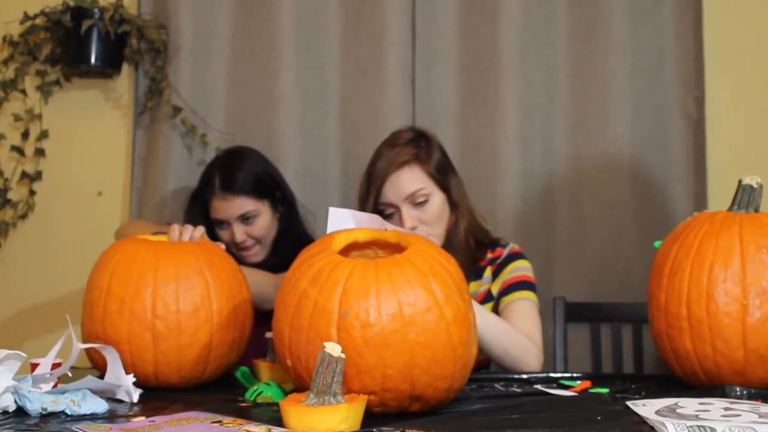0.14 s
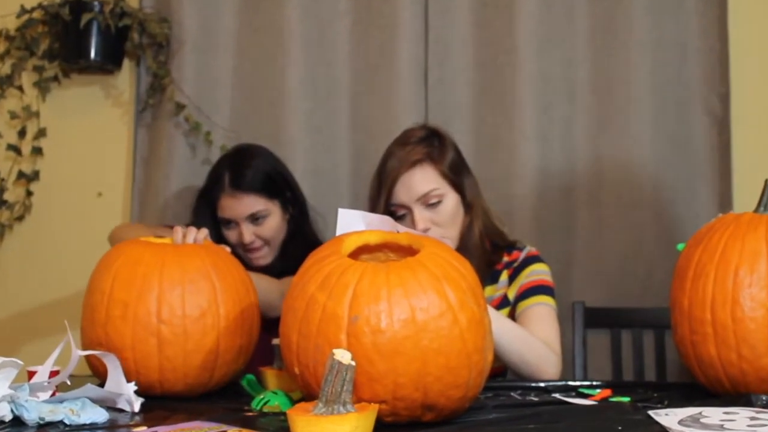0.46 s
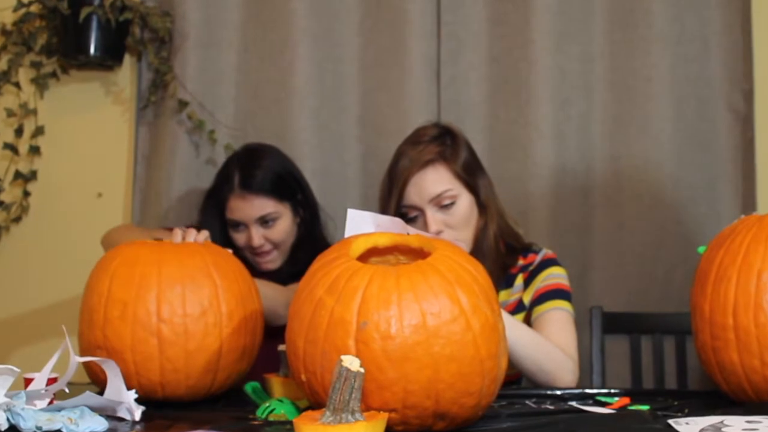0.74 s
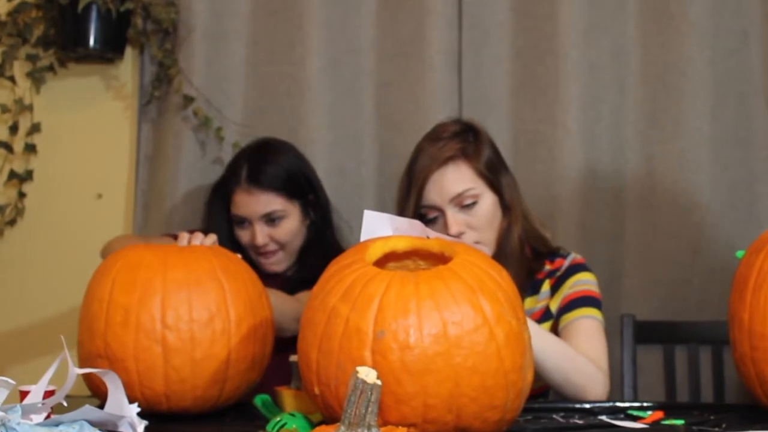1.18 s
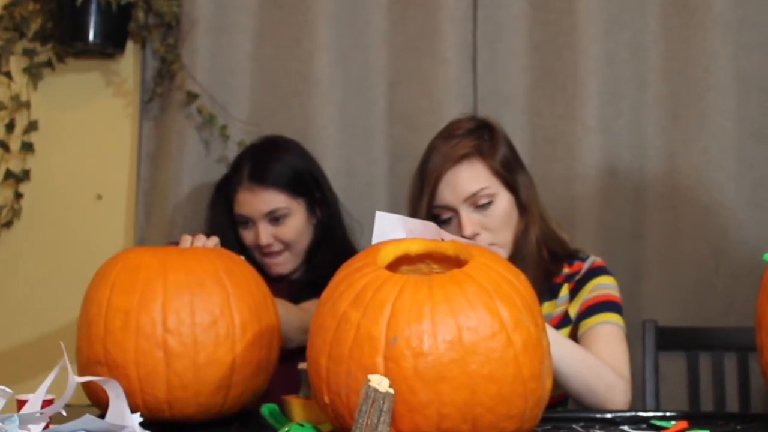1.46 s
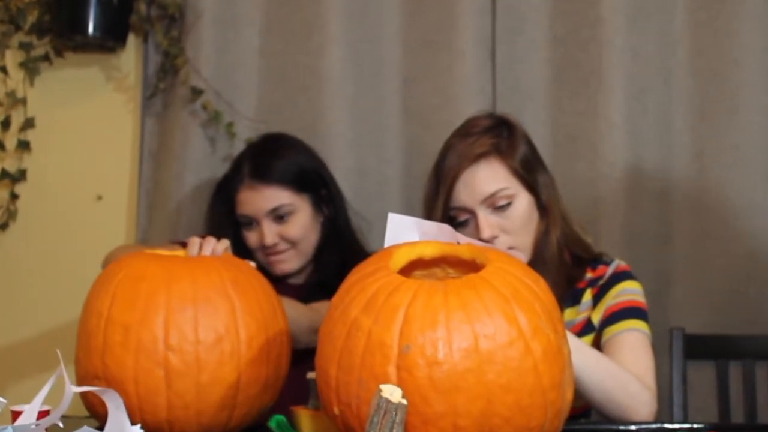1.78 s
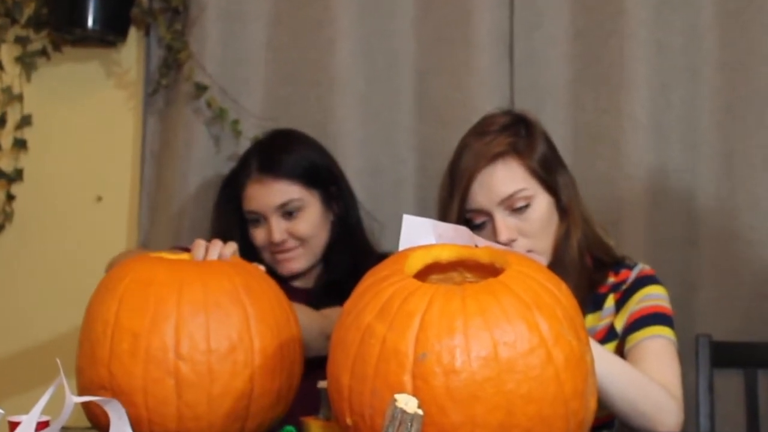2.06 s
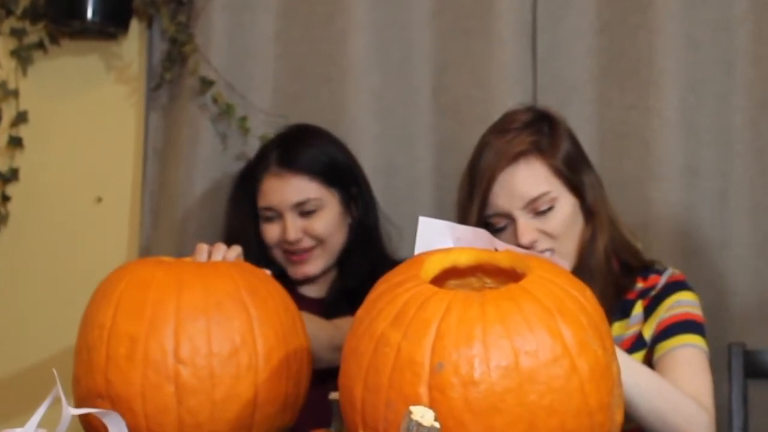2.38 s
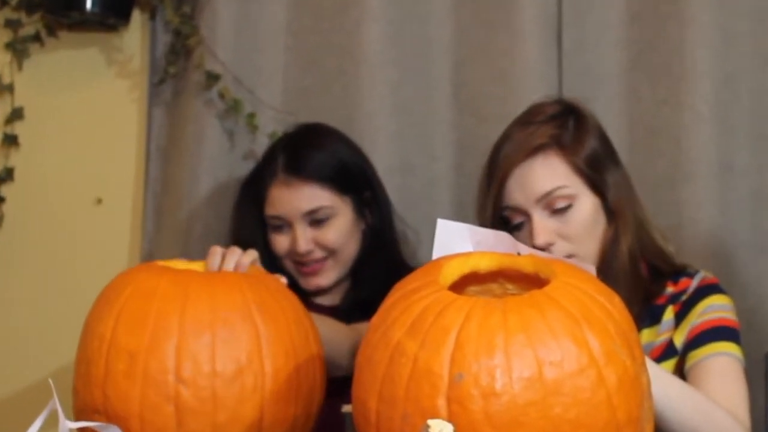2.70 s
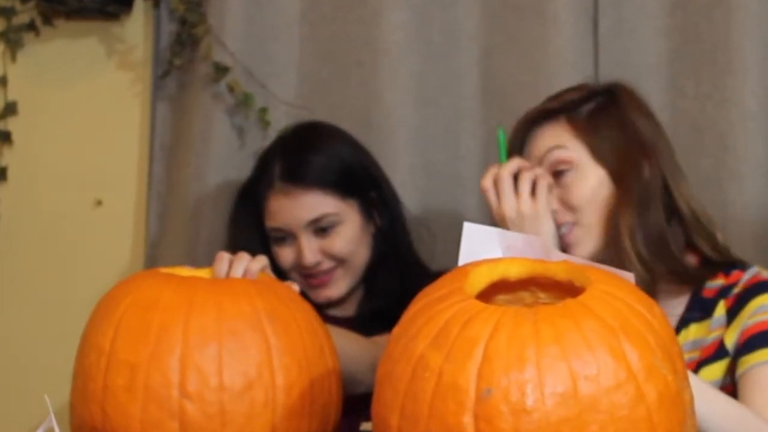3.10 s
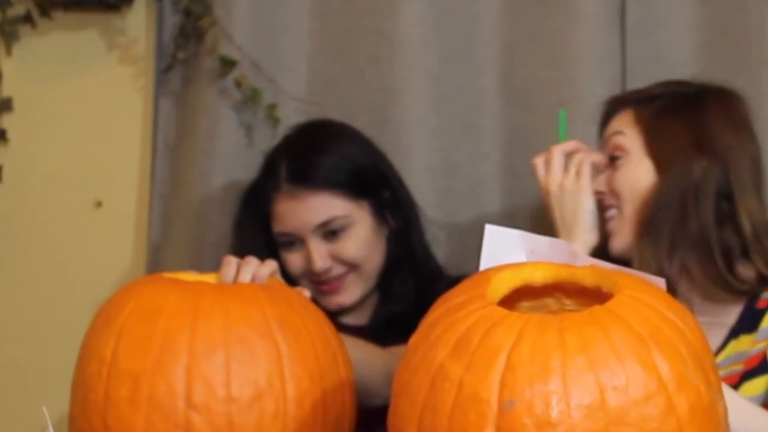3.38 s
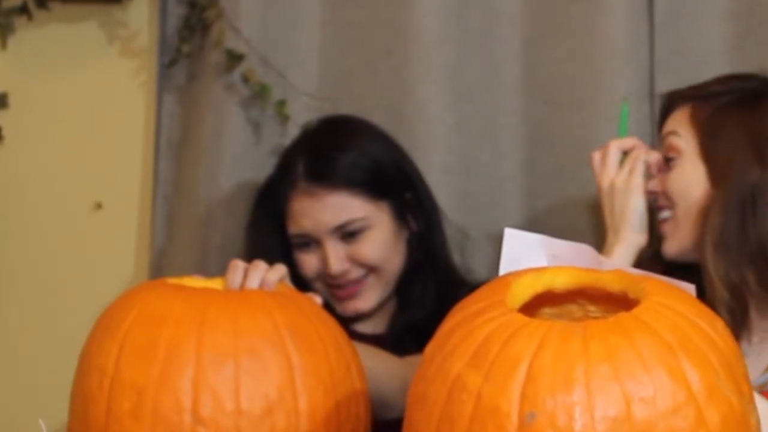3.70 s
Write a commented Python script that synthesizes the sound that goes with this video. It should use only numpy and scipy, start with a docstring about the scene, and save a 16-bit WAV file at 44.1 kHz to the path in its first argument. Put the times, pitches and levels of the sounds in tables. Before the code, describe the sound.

A small hand saw cuts a hollow pumpkin in steady back-and-forth strokes, loud juddering cuts answered by softer rasps, with faint turning clicks and low rocking thuds, close microphone in a small room.

```python
"""Sawing a hollow pumpkin

A small hand saw works back and forth through the thick wall of a pumpkin on a table in a small room.
Random snaps of torn fibre are coloured into rasp, bite and fizz and set the hollow and blade ringing.
Cutting strokes are loud, with juddering catches; return strokes are lighter and mostly rasp.
Clicks at some turns, soft low thuds as the pumpkin rocks and a faint noise background complete the scene.
"""
import sys
import numpy as np
from scipy import signal
from scipy.fft import rfft, irfft
from scipy.io import wavfile

SR = 44100
rng = np.random.default_rng(int(sys.argv[2]) if len(sys.argv) > 2 else 0)


def file_out(sig):
    """Save sig as 16-bit WAV at sys.argv[1]."""
    # one column per channel
    cols = np.atleast_2d(sig).T
    # limit, then scale
    lim = np.clip(cols, -1, 1)
    pcm = np.round(lim * 32767).astype(np.int16)
    wavfile.write(sys.argv[1], SR, pcm)


N = 169785
T = np.arange(N) / SR  # seconds

# strokes in each direction: start_s, end_s, level_db, fastest_point (0-1 of the stroke),
# treble_db, hollow_ring_db, bite_db
CUT_STROKES = [(-.36, .078, -5.5, 0.47, 6, 1.5, -0.5), (.525, .92, -1, 0.49, -1.5, -0.5, 0),
               (1.365, 1.77, -0.5, .53, -2.5, 0, -1.5), (2.203, 2.66, -2, 0.5, -1.5, 2, -1),
               (3.06, 3.448, -1, 0.49, -0.5, 0, -0.5)]
RETURN_STROKES = [(.068, .505, -2, 0.45, 1.5, 1.5, 0), (.935, 1.353, 0.5, 0.49, -0.5, -1.5, 2),
                  (1.772, 2.195, 0.5, 0.45, 2.5, 0.5, 3.5), (2.658, 3.05, 0.5, .49, 3, -2, -2),
                  (3.455, 3.865, 2, 0.43, 1, -6.5, 0.5)]
# moments when the blade catches and judders: middle_s, half_length_s, level_db
CATCHES = [(0.579, 0.011, -36), (0.673, .016, -24), (0.752, 0.015, -31), (0.826, 0.021, -30),
           (1.443, 0.005, -27.5), (1.491, 0.0069, -24), (1.525, 0.011, -23), (1.615, .012, -21.5),
           (1.647, 0.0067, -37), (2.314, 0.018, -30), (2.383, 0.012, -26), (2.551, 0.009, -32),
           (2.583, 0.0071, -34), (3.113, 0.011, -37), (3.207, .014, -31), (3.262, 0.015, -28.5),
           (3.36, 0.015, -33)]
# small clicks as the blade turns round: start_s, level_db
TICKS = [(0.043, -49), (0.907, -45), (.967, -48), (3.058, -50.5), (3.472, -52)]
# the pumpkin rocking on the table: middle_s, level_db
THUDS = [(.61, -60.5), (.885, -56.5), (1.45, -57.5), (1.7, -51), (2.34, -61), (2.54, -52.5), (2.82, -69),
         (3.29, -74), (3.375, -54.5), (3.68, -55.5)]

# resonances of the pumpkin and of the saw blade: pitch_hz, width_hz, level_db
HOLLOW_MODES = [(179.8, 11, -18.5), (228.6, 15, -10.5), (353.5, 32, -14.5), (503, 30, -6), (548.2, 35, 1.5),
                (715, 48, -12.5), (819, 46, -11), (1022, 29, -9), (1250, 70, -15), (1363, 23, -19),
                (1440, 55, -14)]
BLADE_MODES = [(1075, 17, 2.5), (1252, 35, -4), (1328, 41, 8), (1380, 120, -2.5), (1940, 76, -1.5),
               (2120, 60, -12.5), (2523, 45, 0), (3320, 38, -5.5), (3440, 87, -6.5), (3930, 35, -17),
               (5340, 240, -20)]

# tone colours of the rasp each way, the bite, the wet fizz and the background: pitch_hz, level_db (per Hz)
CUT_RASP = [(40, -41), (140, -21.5), (220, -13.5), (300, -9), (480, -1.5), (700, -4), (1000, 0.5),
            (1400, 0.5), (2200, -14.5), (4000, -17.5), (8000, -47.5)]
RETURN_RASP = [(40, -29.5), (130, -13.5), (175, -1.5), (290, -12), (500, 5), (750, -3.5), (1400, 0.5),
               (1700, -1), (2300, -21), (4000, -21), (8000, -31.5)]
BITE_COLOUR = [(40, -39), (125, -22.5), (210, -8.5), (330, -6), (480, 0), (660, -5.5), (830, 6.5),
               (1030, 0), (1550, -5.5), (2300, -17), (8000, -48)]
FIZZ_COLOUR = [(300, -22.5), (1200, -6), (2000, 6.5), (2900, 0), (3700, 0.5), (4100, -5.5), (5500, -3.5),
               (6400, -13.5), (7800, -17)]
BACKGROUND_COLOUR = [(20, -31.5), (50, -12.5), (75, 7), (100, -29), (175, 0.5), (300, 9), (600, 2.5),
                     (1500, 0), (3500, -14), (8000, -23.5)]
# how long the room rings: pitch_hz, t60_s
ROOM_DECAY = [(100, 0.8), (500, 0.22), (2000, 0.18), (8000, 0.19)]

# balance each way: *_db is a layer's level at full speed, *_power the power of speed it follows
# (bite follows its own arch); level_off flattens the top of the speed arch;
# deepest is where the teeth bite most (0-1 of the stroke)
CUT_BALANCE = dict(level_off=.5, rasp_db=-35, rasp_power=2.27, fizz_db=-33.5, fizz_power=5.3, hollow_db=-32.5, hollow_power=1.18, blade_db=-41.5, teeth_db=-36, bite_db=-32, bite_power=2.76, deepest=0.72)
RETURN_BALANCE = dict(level_off=1.6, rasp_db=-41.5, rasp_power=1.78, fizz_db=-45, fizz_power=2.94, hollow_db=-46, hollow_power=0.35, blade_db=-43, teeth_db=-48.5, bite_db=-43, bite_power=1.5, deepest=0.79)

TOOTH_HZ, TOOTH_JITTER = 1257, 0.18  # teeth per second at full speed; rms unevenness as a fraction
SNAPS_PER_S, BITES_PER_S, SNAP_SPREAD_DB = 6000, 1500, 2.5
JOLT_DELAY_S, FREE_S = 0.04, 0.0037  # the blade breaks free this long into a stroke, this abruptly
JOLT_DB, JOLT_S = 3, 0.044  # upper limit of the jolt's level boost, and how long it fades
ROUGH_DB, ROUGH_HZ = 1.35, 220  # coarse grit of single teeth: rms depth, rate
UNEVEN_DB, UNEVEN_HZ = 0.67, 49  # slower unevenness of the tearing: rms depth, rate
JUDDER_HZ, JUDDER_WANDER = 559, 0.026  # rms wander as a fraction
TICK_S = 0.009
THUD_S, THUD_HZ, THUD_UPPER_HZ, THUD_UPPER_DB = 0.042, 74, 118, -6
ROOM_DB, EARLY_DB, EARLY_S, EARLY_FROM_HZ = -11, -6, 0.017, 1310  # echo levels are relative to the dry saw
SAW_MIX_DB, BACKGROUND_DB = -1, -57.5
EDGE_HZ = 8050


def amp(db):
    """Decibels to gain."""
    return 10 ** (np.asarray(db) / 20)


def unit(x):
    """Scales a sound to rms 1."""
    return x / np.sqrt(np.mean(x ** 2) + 1e-20)


def read(points, hz):
    """Reads a table on a log-frequency axis."""
    f, value = np.transpose(points)
    return np.interp(np.log(hz + 1), np.log(f), value)


def colour(x, points):
    """Gives a flat sound a spectrum, at rms 1."""
    gain = amp(read(points, np.fft.rfftfreq(N, 1 / SR)))
    return unit(irfft(rfft(x) * gain, N))


def wander(hz):
    """Random drift that moves no faster than about the given rate, rms 1."""
    lowpass = 1 / (1 + (np.fft.rfftfreq(N, 1 / SR) / hz) ** 4)
    return unit(irfft(rfft(rng.standard_normal(N)) * lowpass, N))


def ring(x, modes):
    """Excites a resonant body: each mode is a cosine that dies faster the wider it is; rms 1."""
    t = T[:SR // 5]
    body = np.zeros(len(t))
    for hz, width, db in modes:
        decay = np.sqrt(width) * np.exp(-np.pi * width * t)
        body += amp(db) * decay * np.cos(2 * np.pi * hz * t)
    return unit(signal.fftconvolve(x, body)[:N])


def snaps(per_s=SNAPS_PER_S):
    """Dense tiny snaps of tearing fibres at random moments, a few of them larger."""
    size = amp(SNAP_SPREAD_DB * np.minimum(rng.exponential(1, N), 4))
    happens = rng.random(N) < per_s / SR
    return size * rng.choice([-1, 1], N) * happens


def background():
    """Faint steady noise behind the saw."""
    return amp(BACKGROUND_DB) * colour(rng.standard_normal(N), BACKGROUND_COLOUR)


def room(x):
    """Quick bright reflections from the table top, then a short tail that is duller as it dies."""
    t = T[:SR // 2]
    hits = rng.random(len(t)) < 2000 / SR  # reflections per second
    taps = rng.choice([-1., 1.], len(t)) * hits * (t > 0.001)
    highpass = signal.butter(2, EARLY_FROM_HZ, "high", fs=SR, output="sos")
    early = signal.sosfilt(highpass, taps * np.exp(-t / EARLY_S))

    # each band of the noise tail falls 60 dB in its own decay time
    noise = rng.standard_normal(len(t)) * (t > 0.008)
    hz, when, bands = signal.stft(noise, SR, nperseg=256)
    fade = amp(-60 * when / read(ROOM_DECAY, hz)[:, None])
    tail = signal.istft(bands * fade, SR, nperseg=256)[1][:len(t)]

    echo = amp(EARLY_DB) * early / np.linalg.norm(early)
    echo += amp(ROOM_DB) * tail / np.linalg.norm(tail)
    return x + signal.fftconvolve(x, echo)[:N]


def thuds():
    """The pushed pumpkin rocks on the table: two low sines under a soft swell for each thud."""
    out = np.zeros(N)
    for middle, db in THUDS:
        phase, upper_phase = 2 * np.pi * rng.random(2)
        sway = np.sin(2 * np.pi * THUD_HZ * T + phase)
        sway += amp(THUD_UPPER_DB) * np.sin(2 * np.pi * THUD_UPPER_HZ * T + upper_phase)
        out += amp(db) * np.exp(-((T - middle) / THUD_S) ** 2) * sway
    return out


def ticks():
    """The blade clicks in the slot as it changes direction: short decaying bursts of bright noise."""
    level = np.zeros(N)
    for start, db in TICKS:
        level += amp(db) * (T > start) * np.exp(-abs(T - start) / TICK_S)
    return level * colour(rng.standard_normal(N), FIZZ_COLOUR)


def judder():
    """A caught blade sticks and slips: a wavering tone near the hollow's main mode, with pulsing fizz."""
    grip = np.zeros(N)
    for middle, half, db in CATCHES:
        grip += amp(db) * np.exp(-((T - middle) / half) ** 2)
    pitch_hz = JUDDER_HZ * (1 + JUDDER_WANDER * wander(47.4))
    phase = 2 * np.pi * np.cumsum(pitch_hz) / SR
    pulsing_fizz = 0.096 * (1 + np.cos(phase)) * colour(snaps(), FIZZ_COLOUR)
    return grip * (unit(np.sin(phase)) + pulsing_fizz)


def arch(start, end, top):
    """One stroke of the arm: from rest up to 1 and back to rest."""
    peak = start + (end - start) * np.clip(top, 0.1, 0.9)
    return np.sin(np.pi * np.interp(T, [start, peak, end], [0, 0.5, 0]))


def teeth(pace):
    """Teeth slip through the rind at an uneven rate that follows the blade's speed."""
    rate_hz = TOOTH_HZ * pace * (1 + TOOTH_JITTER * wander(396.1))
    phase = 2 * np.pi * np.cumsum(rate_hz) / SR
    return unit(np.sin(phase) + 0.16 * np.sin(2 * phase))


def jolt(start):
    """Level boost in dB as the blade breaks free early in a stroke: a quick rise, then a fade."""
    since = T - start - JOLT_DELAY_S
    free = 0.5 + 0.5 * np.tanh(since / FREE_S)
    return JOLT_DB * free * np.exp(-abs(since) / JOLT_S)


def sawing(strokes, rasp_colour, level_off, rasp_db, rasp_power, fizz_db, fizz_power,
           hollow_db, hollow_power, blade_db, teeth_db, bite_db, bite_power, deepest):
    """Strokes one way: rasping flesh, wet fizz at speed, a duller late bite, ringing hollow and blade."""
    pace, rasp, fizz, hollow, bite = np.zeros((5, N))
    for start, end, db, fastest, treble_db, ring_db, press_db in strokes:
        speed = np.tanh(level_off * arch(start, end, fastest)) / np.tanh(level_off)
        jolt_db = jolt(start)
        pace += speed
        rasp += amp(db + jolt_db) * speed ** rasp_power
        fizz += amp(db + treble_db) * speed ** fizz_power
        hollow += amp(db + ring_db + jolt_db) * speed ** hollow_power
        bite += amp(db + press_db) * arch(start, end, deepest) ** bite_power

    scrape = amp(rasp_db) * colour(snaps(), rasp_colour)
    scrape += amp(blade_db) * ring(snaps(), BLADE_MODES)
    scrape += amp(teeth_db) * teeth(pace)
    biting = bite * amp(bite_db) * colour(snaps(BITES_PER_S), BITE_COLOUR)
    flesh = (rasp * scrape + biting) * amp(ROUGH_DB * wander(ROUGH_HZ))
    tearing = flesh + fizz * amp(fizz_db) * colour(snaps(), FIZZ_COLOUR)
    ringing = hollow * amp(hollow_db) * ring(snaps(), HOLLOW_MODES)
    return tearing * amp(UNEVEN_DB * wander(UNEVEN_HZ)) + ringing


def scene():
    """The saw in the room, over the thuds and the quiet background."""
    cuts = sawing(CUT_STROKES, CUT_RASP, **CUT_BALANCE)
    returns = sawing(RETURN_STROKES, RETURN_RASP, **RETURN_BALANCE)
    saw = cuts + returns + ticks() + judder()
    return (amp(SAW_MIX_DB) * room(saw) + thuds() + background())[None]


def record(dry):
    """Cuts the treble steeply above the band edge."""
    lowpass = signal.firwin(701, EDGE_HZ, window=("kaiser", 9), fs=SR)
    return signal.oaconvolve(dry, lowpass[None], "same")


dry = scene()
out = record(dry)
file_out(out)
```